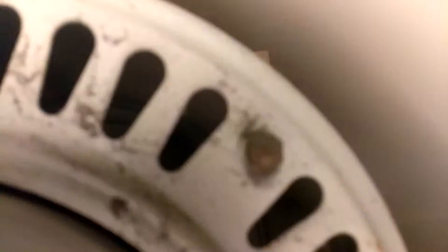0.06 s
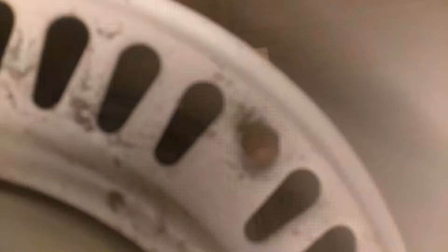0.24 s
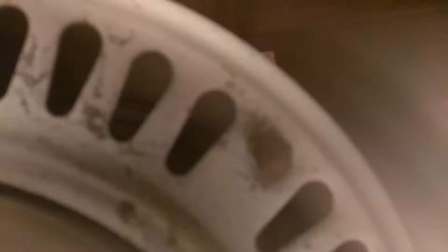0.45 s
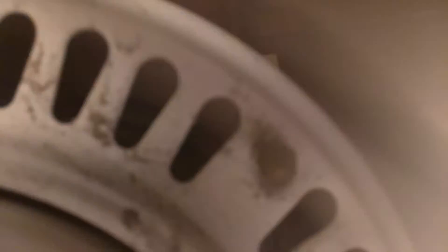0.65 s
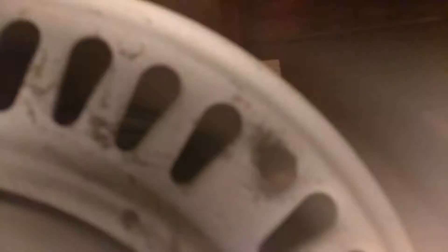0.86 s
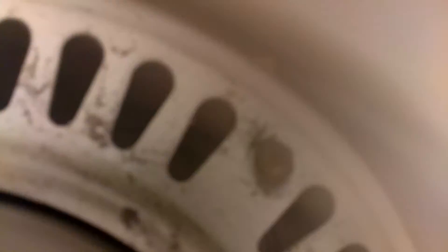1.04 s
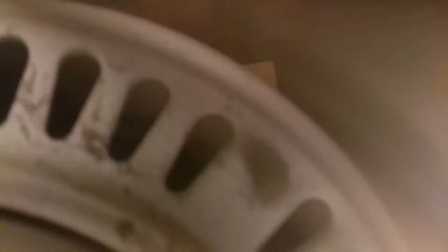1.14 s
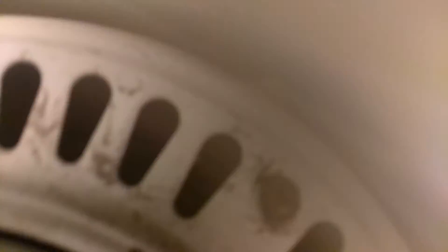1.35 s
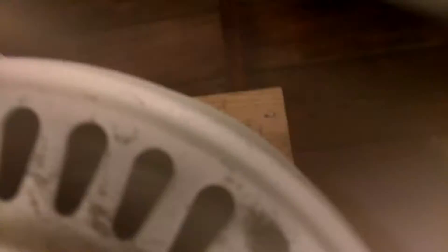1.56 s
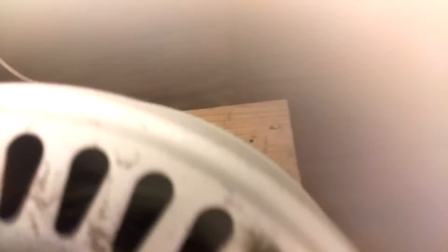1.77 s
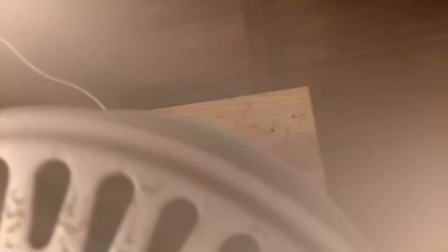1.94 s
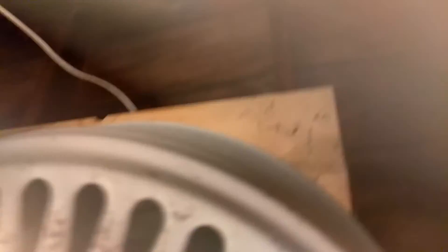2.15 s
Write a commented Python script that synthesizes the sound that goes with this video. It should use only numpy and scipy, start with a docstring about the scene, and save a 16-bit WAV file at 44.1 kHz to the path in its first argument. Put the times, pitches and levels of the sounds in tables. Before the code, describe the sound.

A loose metal part rattles sharply on a ceiling fan, over a low rumble of air.

```python
"""A loose metal part is shaken back and forth, knocking and skidding loudly enough to distort.
Each knock is a crack, a clink of the metal and a hollow thud of its housing, with a little room echo.
A few dry ticks come before the shaking; more ticks and a faint tinkle follow it.
All along a ceiling fan turns close overhead: its draught rumbles and puffs on the microphone's two
openings (the ports), over a soft background whirr and a thin hiss. A sizzle joins near the end."""
import sys
import numpy as np
from scipy import signal
from scipy.fft import rfft, irfft, next_fast_len
from scipy.io import wavfile
from scipy.ndimage import map_coordinates

SR = 44100
rng = np.random.default_rng(int(sys.argv[2]) if len(sys.argv) > 2 else 0)


def dump_mix(stems):
    """Bounce the given channels to the path in sys.argv[1] as a 16-bit WAV at rate SR."""
    frames = np.atleast_2d(stems).T  # one column per channel
    limited = np.clip(frames, -1, 1)  # hard clip at full scale
    pcm = np.round(limited * 32767).astype(np.int16)
    wavfile.write(sys.argv[1], SR, pcm)


N = 97020

# Levels are relative. A fade time (T60) is how long a sound takes to drop by 60 dB.
DRAUGHT = [(0.0, -45, -14), (0.04, -41.5, -6), (0.37, -37.5, -9), (0.77, -43, -1.5), (1.1, -41.5, 1.5),
           (1.12, -45, -12), (1.88, -50.5, -2.5), (1.96, -45.5, -14), (2.2, -50.5, -2.5)]  # moving air at the ports: (time [s], level [dB], left over right [dB])
RUMBLE_COLOUR = [(18, -19.5), (30, 3.5), (54, 5.5), (92, -3.5), (146, -8.5), (200, -19), (300, -30),
                 (500, -57), (900, -120)]  # the air's rumble: (frequency [Hz], level [dB])
# puffs of air: (time [s], level [dB], length [s], left over right [dB], brightness [0-1])
PUFFS = [(0.111, -34.5, 0.016, -21, 0.96), (0.213, -30.5, 0.026, -28.5, 0),
         (0.301, -33.5, 0.0092, -12.5, 0.86), (0.347, -35.5, 0.031, -31, 0.04),
         (0.443, -33.5, 0.023, -12, 1), (0.996, -28, 0.016, -9, 0.53), (1.141, -38, 0.023, -23, 0.65),
         (1.197, -36, 0.015, -19, 1), (1.232, -37, 0.056, -13.5, 0.77), (1.522, -40, 0.026, -9.5, 0.41),
         (1.374, -43.5, 0.044, -21, 0.92), (1.605, -37.5, 0.014, -24.5, 0.36), (1.694, -35, 0.03, -20, 0.1),
         (1.777, -31.5, 0.027, -13, 0), (1.906, -41.5, 0.031, -27, 0.47), (1.98, -34, 0.012, -29, 0.8),
         (2.157, -36, 0.033, -10.5, 0.64)]
WHIRR_LEVELS = [(0, -56.5), (.35, -57), (.6, -51), (1.1, -53.5), (1.3, -66.5), (1.6, -66), (1.78, -60.5),
                (2, -62), (2.2, -66.5)]  # soft background whirr: (time [s], level [dB])
WHIRR_COLOUR = [(150, -25), (250, -5.5), (416, -17), (700, -15.5), (1280, -17), (2040, -24), (3400, -26.5),
                (9000, -44), (12000, -69.5), (19000, -120)]  # the same whirr: (frequency [Hz], level [dB])
HUM_LEVELS = [(0, -61), (.35, -57.5), (1.1, -63.5), (1.298, -93), (2.2, -99)]  # the motor's tone: (time [s], level [dB])
HISS_LEVELS = [(0, -76), (.28, -70), (.4, -43), (1.1, -61.5), (1.3, -58.5), (1.42, -63.5), (1.5, -54),
               (1.62, -63), (1.72, -69.5), (1.8, -64), (2.2, -58.5)]  # thin hiss: (time [s], level [dB])
HISS_COLOUR = [(2350, -37.5), (4000, -8.5), (5020, -7.5), (7530, -5), (9830, -0.5), (14600, -3.5),
               (16000, -18.5)]  # the same hiss: (frequency [Hz], level [dB])
TICKS = [(0.1551, -32, -20, 5), (0.182, -32.5, -13, -5), (1.0943, -13.5, -2.5, -14),
         (1.2156, -22, -7.5, 3.5), (1.5291, -5, 6, -3.5), (1.5334, -26, -6, 33), (1.547, -26, 10, 11),
         (1.554, -30.5, 0, 7.5), (1.562, -24, -0.5, 10), (1.746, -29, 0.5, -2.5), (1.7984, -36, -2, 0.5),
         (1.8387, -38, -1, 16), (1.8435, -18.5, -3.5, -11), (2.165, -23, -4.5, 6)]  # dry ticks: (time [s], level [dB], treble boost [dB], bass boost [dB])
TICK_COLOUR = [(150, -36.5), (400, 2.5), (900, -1.5), (1700, 0.5), (2200, 5), (3700, -4), (6000, -3),
               (9000, -2.5), (11000, -3.5), (16000, -15)]  # a tick's snap: (frequency [Hz], level [dB])
# knocks of the part: (time [s], crack level [dB], thud over crack [dB], clink over crack [dB],
# rise [s], crack hold [s], ping pitch [Hz]); the ping's pitch depends on how the part lands
KNOCKS = [(0.2908, -49, -19.5, -29.5, .0005, 0.0013, 5500), (0.3154, -42.5, 1.5, -18, 0.00051, .002, 5930),
          (0.342, -19.5, -11.5, -7.5, 0.00088, 0.00059, 5460),
          (0.363, -15, -12, -5.5, 0.0042, 0.0059, 5500), (0.3732, -10, -8, -6.5, 0.0024, 0.0054, 5920),
          (.488, -18.5, -18, -16, 0.00017, 0.00052, 5450), (0.4986, -28, -6, -20.5, 0.00078, 0.00074, 5450),
          (0.5074, -13, -11.5, -3.5, 0.00053, .0041, 5860), (0.6007, -11, -19, -9, 0.00046, 0.003, 5260),
          (0.6202, -20.5, -10.5, -13.5, 0.00061, 0.0013, 5650),
          (0.6313, -14, -15, -16.5, 0.00079, 0.00075, 5400),
          (0.6373, -9.5, -7.5, -11.5, 0.0011, 0.0053, 5470), (0.7578, -27.5, -13, -4, 0.00068, .001, 5760),
          (0.77, -22, -9.5, -16, 0.0025, .003, 5800), (0.7822, -10, -16, -5, 0.00097, 0.0024, 5580),
          (0.8652, -4.5, -23, -3, 0.00013, 0.0014, 5360), (0.88, -18, -9.5, -18.5, 0.0017, 0.003, 5460),
          (0.8921, -15.5, -12.5, -17.5, 0.0028, 0.0048, 5800),
          (0.8975, -9.5, -9, -1.5, 0.0022, 0.009, 5260), (1.0168, -33, -7, -27.5, 0.0008, 0.0016, 5370),
          (1.029, -30, -13.5, -19, .0005, 0.00088, 5550), (1.0359, -24.5, -17, -32, .001, 0.0023, 5500),
          (1.042, -27, 0, -17.5, 0.00061, 0.00089, 5500), (1.0464, -11.5, -13.5, -6.5, .001, 0.0024, 5360)]
CRACK_COLOUR = [(1470, -26), (2500, -5), (3630, -8.5), (4950, -6.5), (5480, -1.5), (7830, -8), (8270, -1.5),
                (9010, -7), (11400, -3.5), (16000, -14.5)]  # a knock's bright crack: (frequency [Hz], level [dB])
THUD_COLOUR = [(120, -34.5), (200, -1), (425, -2), (695, -6.5), (904, -1.5), (1550, 1.5), (2390, -3.5),
               (3500, -22), (4550, -12), (7700, -120)]  # a knock's dull thud: (frequency [Hz], level [dB])
HOUSING_TONES = [(362.8, -7.5, 0.052), (428, -5.5, 0.11), (936.6, -7.5, 0.094), (1159, -14.5, 0.2),
                 (1225, -9, 0.13), (1315, -13, 0.18), (1462, -13.5, 0.16), (1533, -23.5, 0.76),
                 (1744, -3.5, 0.065), (1955, -4.5, 0.11)]  # the hollow shell ringing: (pitch [Hz], level [dB], fade time [s])
METAL_TONES = [(2087, -3.5, 0.024), (2283, 0, .03), (2452, -5, 0.027), (7130, -5, 0.03), (8430, -4, 0.054),
               (9540, 6.5, 0.017), (10320, -1, 0.031), (11210, 1.5, 0.01), (11370, -9.5, 0.026),
               (13130, -12, 0.015)]  # the loose part ringing: (pitch [Hz], level [dB], fade time [s])
SKIDS = [(0.332, 0.034, -41.5), (0.365, 0.042, -35.5), (0.483, 0.027, -29), (0.599, 0.064, -31.5),
         (0.7482, 0.027, -32), (0.889, 0.028, -30.5), (0.912, 0.029, -38), (1.0097, 0.023, -33)]  # the part sliding: (start [s], length [s], level [dB])
ROOM_FADES = [(300, 0.57), (1400, 0.73), (4000, 0.21), (10000, 0.33)]  # the room's echo: (frequency [Hz], fade time [s])
TINKLES = [(1.116, 14060, -44, .2), (1.116, 12870, -50, .25), (1.12, 8480, -50, .35), (1.12, 9470, -55, .6),
           (1.255, 9470, -50, .3), (1.393, 14060, -52, .1), (1.393, 12870, -54, .1)]  # a thin part ringing: (time [s], pitch [Hz], level [dB], fade time [s])
SIZZLE_LEVELS = [(0, -100), (1.8, -100), (1.87, -62.5), (2, -53), (2.03, -61), (2.1, -55.5), (2.2, -49.5)]  # late sizzle: (time [s], level [dB])
SIZZLE_BANDS = [(4625, 100, -1), (5740, 270, -2.5), (7970, 410, 0.5), (8900, 930, -17.5), (11370, 310, 1),
                (11450, 400, -7.5), (12950, 500, -8)]  # its bands of noise: (centre [Hz], width [Hz], level [dB])
PORT_BALANCE = [(60, -10.5), (240, -6), (480, 3), (950, 1), (2300, 1), (3770, 0), (6000, 3), (8500, 4),
                (10500, 19), (13000, 16), (16000, 8.5)]  # the left port is brighter: (frequency [Hz], left over right [dB])
# the ticks lean to the right: (frequency [Hz], level added on the left and taken from the right [dB])
TICK_BALANCE = [(400, -9), (2000, -0.5), (5000, -4.0), (8000, -3), (12000, -6)]
T = np.arange(N) / SR


def amp(db):
    """Turn decibels into a gain."""
    return 10 ** (np.asarray(db) / 20)


def unit(x):
    """Scale a signal to an average power of 1."""
    return x / np.sqrt(np.mean(x ** 2) + 1e-20)


def along(points, hz):
    """Read between (frequency, value) points on a log frequency axis."""
    f, v = np.transpose(points)
    return np.interp(np.log(hz + 1), np.log(f + 1), v)


def curves(rows):
    """One value per sample for each column after the time."""
    times, *columns = np.transpose(rows)
    return [np.interp(T, times, column) for column in columns]


def wobble(rate):
    """Two smooth random curves, each passing through `rate` random values a second."""
    knots = rng.standard_normal((2, 600))
    return np.array([map_coordinates(k, [T * rate]) for k in knots])


def filtered(x, response):
    """Scale each frequency in x by response(hz)."""
    size = next_fast_len(x.shape[-1] + 8192)
    return irfft(rfft(x, size) * response(np.fft.rfftfreq(size, 1 / SR)), size)[..., :x.shape[-1]]


def noise(colour, size=N):
    """Noise with the given tone colour, different at each port."""
    return unit(filtered(rng.standard_normal((2, size)), lambda hz: amp(along(colour, hz))))


def add(track, start, sound):
    """Mix a sound in at a time in seconds."""
    part = track[:, max(round(start * SR), 0):][:, :sound.shape[-1]]
    part += sound[:, :part.shape[-1]]


def draught():
    """The fan's air rumbles unevenly on each port."""
    db, pan = curves(DRAUGHT)
    rumble = unit(amp(1.3 * wobble(14.19)) * noise(RUMBLE_COLOUR))
    return amp(db + 7.5 + np.array([pan, -pan]) / 2) * (rumble - 0.13 * rumble[::-1])


def whirr():
    """A soft background whirr that wavers and grows louder for a while in the middle."""
    return amp(curves(WHIRR_LEVELS)[0] + 5.0 + 0.45 * wobble(32.0)) * noise(WHIRR_COLOUR)


def motor_hum(hz=486):
    """The fan's motor hums with one faint, wavering tone, louder on the right."""
    level = amp(curves(HUM_LEVELS)[0] + 1.6 * wobble(24.0) + [[-12], [0]])
    return level * np.sin(2 * np.pi * hz * T + 0.67 * wobble(5.5))


def hiss():
    """A thin, high hiss swells and flickers."""
    return amp(curves(HISS_LEVELS)[0] + 1.5 * wobble(17.0)) * noise(HISS_COLOUR)


def puffs(dull_hz=49.2, bright_octaves=1.72, snap_db=7.5, snap_share=0.25):
    """Air strikes the ports in brief pressure swings; bright puffs are higher and have a sharp snap."""
    out = np.zeros((2, N))
    for centre, db, length, pan, bright in PUFFS:
        offset = 2 * (T - centre) / length
        hz = dull_hz * 2 ** (bright_octaves * bright)
        swing = np.exp(-offset ** 2) * np.cos(2 * np.pi * (hz * (T - centre) + rng.random((2, 1))))
        snap = bright ** 2 * amp(snap_db) * np.exp(-(offset / snap_share) ** 2)
        out += amp(db + np.array([[pan], [-pan]]) / 2) * (swing + snap)
    return out


def ticks(snap_t60=.0055, tail_t60=.03):
    """In each dry tick a faint creak leads into a very short snap with a quiet tail."""
    out, t = np.zeros((2, N)), T[:SR // 10] - .01
    after = np.clip(t, 0, None)
    creak = amp(-19.5) * np.exp(np.clip(t, None, 0) / 0.0019) * (t <= 0)
    snap = (1 - np.exp(-after / 0.00079)) * amp(-60 * after / snap_t60)
    tail = amp(-13.5 - 60 * after / tail_t60) * (t > 0)
    for start, db, treble_db, bass_db in TICKS:
        colour = [(hz, level + treble_db * (hz > 5000) + bass_db * (hz < 1200))
                  for hz, level in TICK_COLOUR]
        add(out, start + t[0], amp(db - 2.0) * (creak + snap + tail) * noise(colour, len(t)))
    return filtered(out, lambda hz: amp(along(TICK_BALANCE, hz) * np.array([[1], [-1]])))


def uneven(x, depth_db=4, spacing_hz=350):
    """Give a sound its own random peaks and dips in tone colour, alike at both ports."""
    knots = rng.standard_normal(80)
    return filtered(x, lambda hz: amp(depth_db * map_coordinates(knots, [hz / spacing_hz])))


def ring(tones, t, detune, scatter_db=3):
    """A struck object rings with fading tones, a little different in pitch and level at each blow."""
    hz, db, t60 = np.transpose(tones)[:, :, None]
    pitch = hz * (1 + detune * rng.standard_normal(hz.shape))
    db = db + scatter_db * rng.standard_normal((2,) + hz.shape)
    return (amp(db - 60 * t / t60) * np.sin(2 * np.pi * (pitch * t + rng.random(db.shape)))).sum(1)


def knocks(crack_t60=0.028, thud_t60=0.1, ping_db=4, ping_t60=.022):
    """Each knock is a short rough crack, a hollow thud of the housing and a clink of the part."""
    out, t = np.zeros((2, N)), T[:SR // 3]
    for start, db, thud_db, clink_db, rise, hold, ping_hz in KNOCKS:
        attack = np.clip(t / rise, 0, 1) ** 2
        crack_fade = amp(-60 * np.clip(t - hold, 0, None) / crack_t60)
        crack = crack_fade * unit(uneven(noise(CRACK_COLOUR, len(t))))
        thump = amp(-60 * t / thud_t60) * noise(THUD_COLOUR, len(t))
        thud = (1 - np.exp(-t / 0.0019)) * (thump + ring(HOUSING_TONES, t, detune=0.0057))
        clink = ring(METAL_TONES + [(ping_hz, ping_db, ping_t60)], t, detune=0.0038)
        add(out, start, amp(db) * attack * (crack + amp(thud_db) * thud + amp(clink_db) * clink))
    return out


def room_echo(x):
    """The room answers a moment later, and each frequency dies away at its own speed."""
    hz, t, spectrum = signal.stft(rng.standard_normal((2, SR // 2)), SR, nperseg=256)
    fade = amp(-60 * t / along(ROOM_FADES, hz)[:, None])
    tail = signal.istft(spectrum * fade, SR, nperseg=256)[1]
    delayed = np.pad(x, ((0, 0), (300, 0)))
    return signal.fftconvolve(delayed, tail / np.linalg.norm(tail[0]), axes=1)[:, :N]


def skids(bumps_per_s=1100, stop_t60=0.062, jingle_db=-6.5):
    """The part skids between knocks in a gritty stream of tiny bumps that keep it jingling."""
    level = np.zeros(N)
    for start, length, db in SKIDS:
        attack = np.clip((T - start) * 500, 0, 1)
        level += attack * amp(db - 60 * np.clip(T - start - length, 0, None) / stop_t60)
    bumps = (rng.random(N) < bumps_per_s / SR) * amp(0.85 * np.clip(rng.standard_normal(N), -2, 1.2))
    grit = unit(np.convolve(bumps, amp(-60 * T[:400] / 0.01))[:N])
    clink = ring(METAL_TONES, T[:SR // 10], detune=0.0034)
    jingle = unit(signal.fftconvolve(bumps[None], clink, axes=1)[:, :N])
    scrape = (0.4 + grit) * (noise(CRACK_COLOUR) + amp(-10) * noise(THUD_COLOUR))
    return level * (scrape + amp(jingle_db) * jingle)


def tinkle():
    """After the shaking stops, a thin part rings with a few faint, wavering tones."""
    out = np.zeros((2, N))
    for start, hz, db, t60 in TINKLES:
        t = np.clip(T - start, 0, None)
        level = amp(db + 2.7 * wobble(20) - 60 * t / t60) * (1 - np.exp(-t / 0.0029))
        out += level * np.sin(2 * np.pi * hz * T + wobble(39))
    return out


def sizzle():
    """Narrow bands of high noise set in near the end."""
    def bands(hz):
        return sum(amp(db) / (1 + (2 * (hz - centre) / width) ** 2)
                   for centre, width, db in SIZZLE_BANDS)
    level = amp(curves(SIZZLE_LEVELS)[0] + 1.114 * wobble(44.97))
    return level * unit(filtered(rng.standard_normal((2, N)), bands))


def scene(echo_db=-16, bass_cut_hz=36):
    """Mix the sounds that reach the two ports with the air that blows on them."""
    rattle = knocks() + skids()
    sounds = rattle + amp(echo_db) * room_echo(rattle) + tinkle() + ticks()
    sounds += whirr() + motor_hum() + sizzle() + hiss()
    sounds = filtered(sounds, lambda hz: amp(along(PORT_BALANCE, hz) * np.array([[.5], [-.5]])))
    air = filtered(draught() + puffs(), lambda hz: 1 / (1 + (bass_cut_hz / (hz + 1)) ** 8))
    return sounds + air


def record(dry):
    """The loudest peaks are squashed (clipped) and the very highest treble is cut off."""
    squashed = dry / (1 + np.abs(dry / 1.05) ** 6) ** (1 / 6)
    trimmed = filtered(squashed, lambda hz: (hz < 16470) / (1 + (hz / 15900) ** 60))
    return np.clip(trimmed, -1, 1)


dry = scene()
out = record(dry)
dump_mix(out)
```